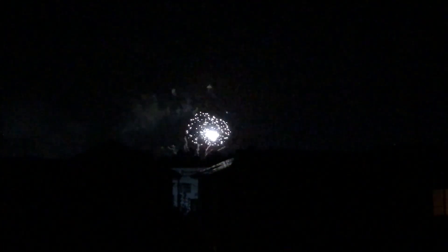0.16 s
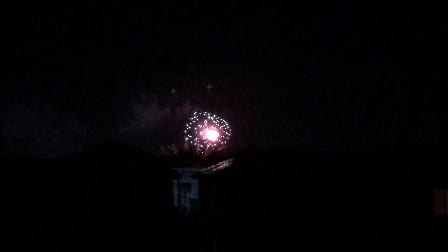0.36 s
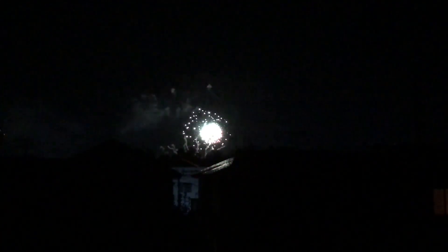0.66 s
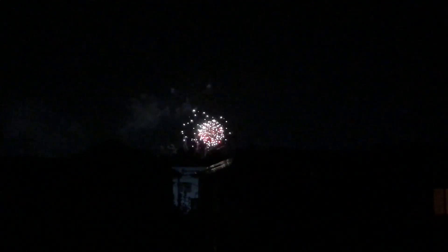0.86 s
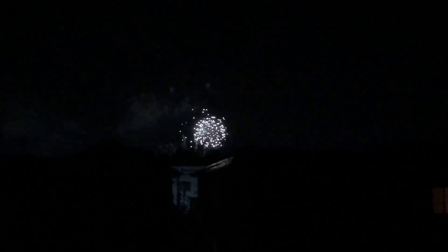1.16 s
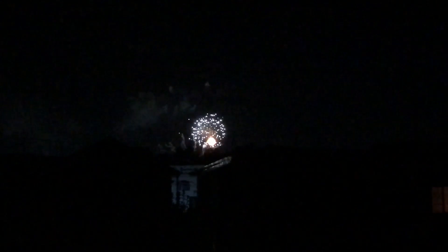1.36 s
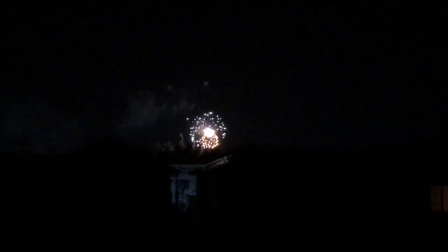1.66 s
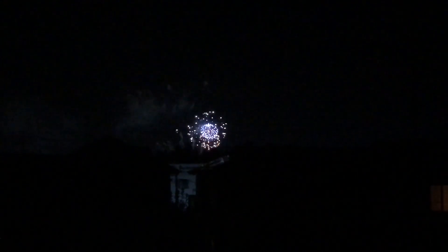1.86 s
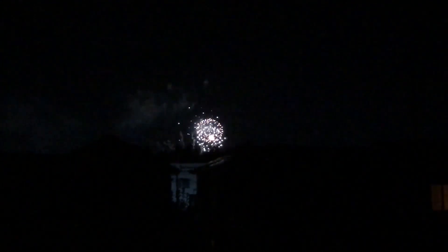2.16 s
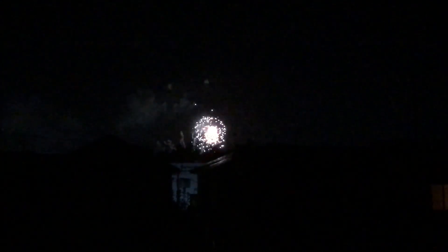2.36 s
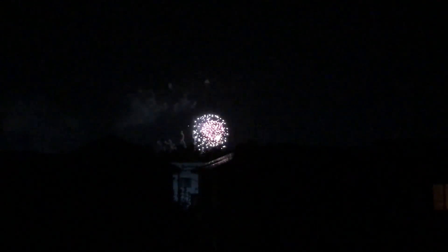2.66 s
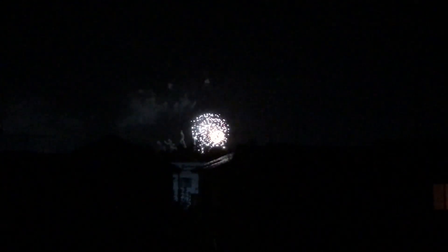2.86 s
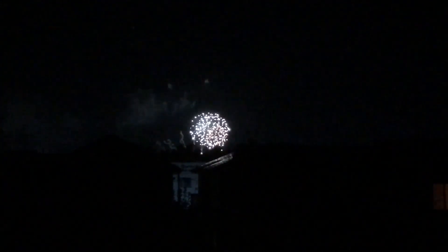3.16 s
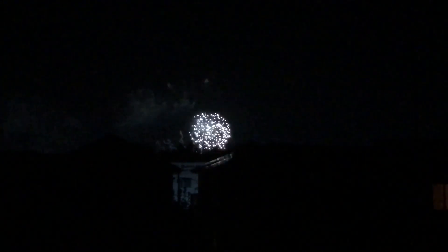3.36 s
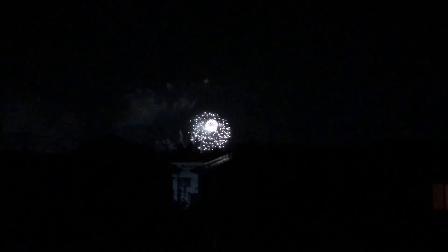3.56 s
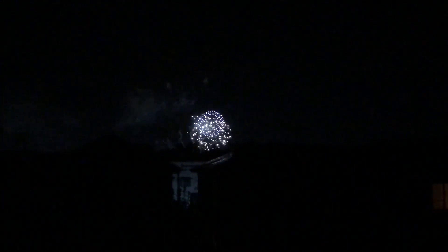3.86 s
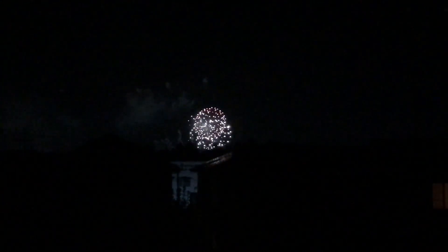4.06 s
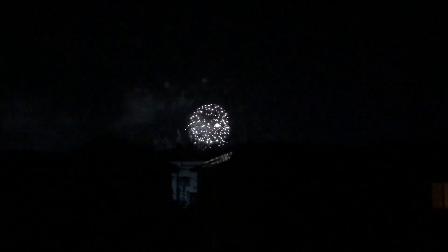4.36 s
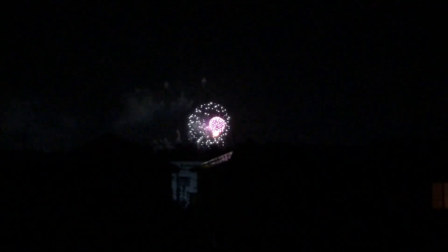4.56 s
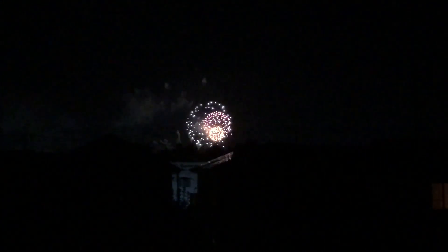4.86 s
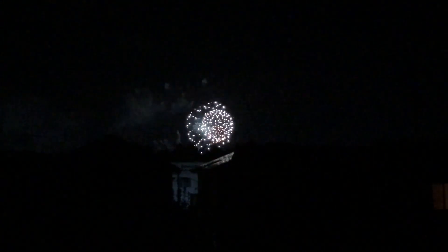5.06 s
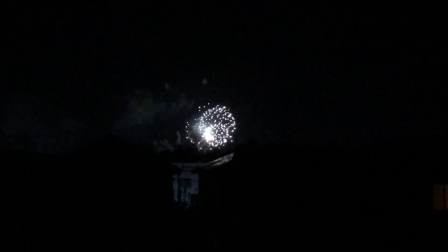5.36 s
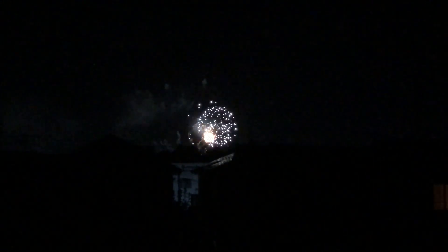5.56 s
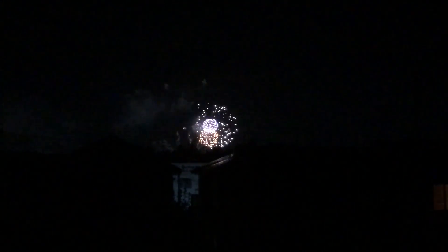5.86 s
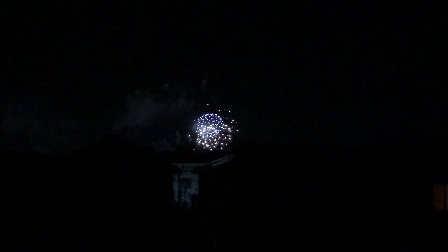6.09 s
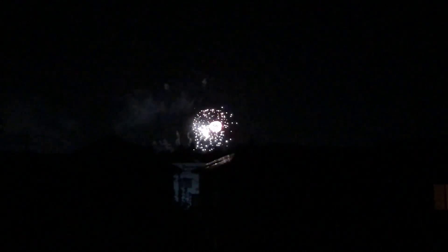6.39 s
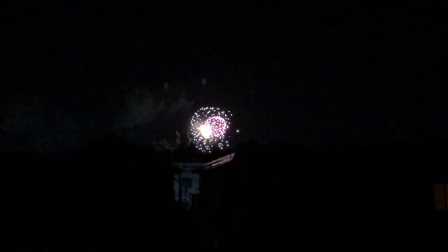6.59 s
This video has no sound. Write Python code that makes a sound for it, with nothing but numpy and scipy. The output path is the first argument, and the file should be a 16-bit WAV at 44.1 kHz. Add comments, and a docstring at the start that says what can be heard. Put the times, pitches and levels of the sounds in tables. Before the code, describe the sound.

Distant fireworks over dark open land: low booming double reports with brief cracks on top, each trailing a rolling echo that decays before the next. Small faint pops fall between them. Nearby, a cricket whistles in quick pulsing phrases above a soft insect chorus, and a very high, hissing buzz rises and cuts off late on. Quiet, dull night air lies beneath, heard in mono..

```python
"""Crickets sing over quiet night air while the roll of earlier firework blasts dies away.
Shells then burst far off, mostly in pairs: shaped pulses whose crack slides down into a late thump.
Scattered reflections follow each report, then a lumpy roll of decaying noise from the land.
Insects are pulsed whistles and ringing noise; a thin high buzz, a train of ticks with hiss,
swells about once a second, loudest near the end."""
import sys
import numpy as np
from scipy import signal
from scipy.fft import rfft, irfft, next_fast_len
from scipy.io import wavfile
from scipy.ndimage import uniform_filter1d

SR = 44100
rng = np.random.default_rng(int(sys.argv[2]) if len(sys.argv) > 2 else 0)


def pcm_store(signal):
    """Save signal as 16-bit PCM."""
    levels = np.round(np.clip(np.atleast_2d(signal), -1, 1) * 32767)
    wavfile.write(sys.argv[1], SR, levels.astype(np.int16).T)


N = 296793  # length in samples
T = np.arange(N) / SR
SIZE = 2 * next_fast_len(N // 2 + 1)
HZ = np.fft.rfftfreq(SIZE, 1 / SR)


def gain_of(db):
    """Decibels to an amplitude factor."""
    return 10 ** (np.asarray(db) / 20)


def evened(x):
    """Scales to rms 1."""
    return x / np.sqrt(np.mean(x ** 2) + 1e-30)


def read(points, hz):
    """Reads a table of (pitch_hz, value) on a log-frequency axis."""
    f, value = np.transpose(points)
    return np.interp(np.log(hz + 1), np.log(f + 1), value)


def add(mix, start_s, sound):
    """Mixes a sound in at a start time, which may lie before zero."""
    at = round(start_s * SR)
    sound = sound[max(-at, 0):]
    part = mix[max(at, 0):][:len(sound)]
    part += sound[:len(part)]


def noise(db):
    """Noise of rms 1 with the given spectrum."""
    spectrum = rfft(rng.standard_normal(SIZE)) * gain_of(db)
    return evened(irfft(spectrum, SIZE)[:N])


def ring(hz, width_hz):
    """A wing resonance blurred by many paths through the grass: narrow noise of rms 1."""
    return noise(-20 * np.log10(1 + ((HZ - hz) / width_hz) ** 2))


def wander(hz):
    """Random drift of rms 1, mostly slower than the given rate."""
    return noise(-40 * np.log10(1 + (HZ / hz) ** 2))


def scatter(decay_s, start_s, per_s=4000, size=6000):
    """Weak reflections from nearby ground and trees: random signed taps, energy 1."""
    t = np.arange(size) / SR
    taps = rng.choice([-1., 1.], size) * (rng.random(size) < per_s / SR)
    # silent until start_s, fully open at twice that
    taps *= np.exp(-t / decay_s) * np.clip(t / start_s - 1, 0, 1)
    return taps / np.linalg.norm(taps)


# spectral shape of night air and distant rumble: pitch_hz [Hz], level_db [dB per Hz, relative]
AIR_SHAPE = [(15, -50.5), (30, -23.5), (60, -11.5), (120, -7), (210, 0.5), (300, -6.5), (400, -14),
             (600, -19), (1200, -24.5), (2500, -35.5), (5000, -40.5), (9500, -43), (14000, -46.5),
             (15600, -41)]
AIR_DB = -56


def night_air():
    """Steady noise shaped like still air and distant rumble, its level barely drifting."""
    return gain_of(AIR_DB + .5 * wander(4)) * noise(read(AIR_SHAPE, HZ))


# spectral shape of the far insect chorus: pitch_hz [Hz], level_db [dB per Hz, relative]
CHORUS_SHAPE = [(2900, -42), (3300, -17.5), (3600, -2.5), (3950, 1.5), (4200, -10.5), (4500, -22.5),
                (5000, -45)]


def far_chorus():
    """So many far singers that their whistles merge into a band of flickering noise."""
    return gain_of(-66.0 + 1.4 * wander(40)) * noise(read(CHORUS_SHAPE, HZ))


# a lisping insect's calls: start_s [s], end_s [s]
LISP_CALLS = [(.2, 1.2), (2.58, 3.7)]
LISP_DB, LISP_REST_DB = -82, -93.5  # amplitudes add during a call
LISP_RISE_S, LISP_FALL_S = .32, .12


def lisping_insect():
    """A high wing resonance that swells, holds and fades over its own faint steady lisp."""
    calls = np.zeros(N)
    for start_s, end_s in LISP_CALLS:
        rise, fall = (T - start_s) / LISP_RISE_S, (end_s - T) / LISP_FALL_S
        calls += np.clip(np.minimum(rise, fall), 0, 1)
    return (gain_of(LISP_REST_DB) + gain_of(LISP_DB) * calls) * ring(7830, 300)


TRILL_FIRST_S, TRILL_EVERY_S, TRILL_LENGTH_S = -.255, .873, .455


def trilling_cricket():
    """Fast wing strokes in evenly spaced runs that grow, creep up in pitch and stop short."""
    since = (T - TRILL_FIRST_S) % TRILL_EVERY_S
    gate = np.clip(np.minimum(since, TRILL_LENGTH_S - since) / .025, 0, 1)
    swell = gate * np.minimum(.5 + 2 * since, 1)
    stroke_hz = 100 + 4 * wander(5)
    beat = 1 + .7 * np.sin(2 * np.pi * np.cumsum(stroke_hz) / SR)
    whistle_hz = np.interp(since, [.15, .28], [6590, 6720])
    whistle = np.exp(2j * np.pi * np.cumsum(whistle_hz) / SR)
    # random amplitude and phase blur the pure tone
    blurred = (whistle * (wander(130) + 1j * wander(130))).real
    return gain_of(-79) * swell * evened(beat * blurred)


def chirping_cricket():
    """Evenly spaced chirps of a wing resonance that start quickly and fade into the grass."""
    first_s, period_s, hold_s = .128, .1797, .068
    age = (T - first_s) % period_s
    rise = np.minimum(age / .0068, 1)
    chirp = rise * np.exp(-np.maximum(age - hold_s, 0) / .043)
    return gain_of(-68) * chirp * ring(5232, 120)


def strokes(first_s, last_s, step_s, db):
    """Evenly spaced wing strokes as (start_s, level_db)."""
    count = round((last_s - first_s) / step_s) + 1
    return [(s, db) for s in np.linspace(first_s, last_s, count)]


# the nearest cricket's phrases, slow loud strokes and then quick soft ones:
# first_stroke_s [s], last_slow_stroke_s [s], last_quick_stroke_s [s]
CRICKET_PHRASES = [(0.373, 0.73, 1.477), (1.536, 1.854, 2.272), (2.301, 2.624, 3.196),
                   (3.242, 3.505, 3.666), (4.352, 4.841, 5.429), (6.061, 6.498, 6.72)]
SLOW_STEP_S, QUICK_STEP_S, PAUSE_S = .063, .038, .075  # steps are rounded to fit the phrase
SLOW_DB, QUICK_DB = -54.5, -59


def near_cricket():
    """Each wing stroke whistles, sagging in pitch, with a weaker, lower second half."""
    out = np.zeros(N)
    t = np.arange(-SR // 40, SR // 40) / SR
    first_half = np.exp(-(t / np.where(t < 0, .009, .006)) ** 2)
    shape = first_half + .7 * np.exp(-((t - .0115) / .005) ** 2)
    for first_s, turn_s, last_s in CRICKET_PHRASES:
        slow = strokes(first_s, turn_s, SLOW_STEP_S, SLOW_DB)
        quick = strokes(turn_s + PAUSE_S, last_s, QUICK_STEP_S, QUICK_DB)
        for s, db in slow + quick:
            hz = 4030 + 30 * rng.standard_normal() - 21000 * t  # sags 21 Hz each millisecond
            angle = 2 * np.pi * np.cumsum(hz) / SR
            stroke = shape * (np.sin(angle) + gain_of(-26) * np.sin(2 * angle))
            add(out, s + t[0], gain_of(db + 1.0 * rng.standard_normal()) * stroke)
    grass = gain_of(-7) * signal.fftconvolve(out, scatter(decay_s=.018, start_s=.003))[:N]
    return out + grass


# swells of the high buzz: full_strength_s [s], level_db [dB, before the buzz's final trim]
BUZZ_SWELLS = [(1.69, -84.5), (2.72, -83), (3.66, -84), (4.68, -81.5), (5.72, -63), (6.76, -62.5)]
BUZZ_RISE_DB_PER_S, BUZZ_HOLD_S, BUZZ_FALL_DB_PER_S, BUZZ_REST_DB = 48.5, .22, 200, -96


def buzz_level():
    """Buzz level in dB before trim: every swell climbs steadily, holds, then drops away."""
    swells = []
    for s, db in BUZZ_SWELLS:
        climb = BUZZ_RISE_DB_PER_S * np.maximum(s - T, 0)
        drop = BUZZ_FALL_DB_PER_S * np.maximum(T - s - BUZZ_HOLD_S, 0)
        swells.append(db - climb - drop)
    return np.maximum(np.max(swells, axis=0), BUZZ_REST_DB)


# colour of the buzz when soft: pitch_hz [Hz], level_db [dB, relative]
SOFT_COLOUR = [(8000, -25.5), (10500, -10.5), (11600, -0.5), (12300, 7), (13300, -9.5), (16000, -20)]
# its wider colour when loud: pitch_hz [Hz], level_db [dB, relative]
LOUD_COLOUR = [(7300, -34), (8500, -24), (9500, -15.5), (11000, -4), (12700, 1.5), (14000, -3), (15700, -5)]
BUZZ_HZ = 348.3  # ticks per second


def high_buzz():
    """A train of tiny ticks, built from its high overtones plus hiss, widening with effort."""
    db = buzz_level()
    effort = np.clip((db + 81) / 12, 0, 1)
    turns = np.cumsum(BUZZ_HZ * (1 + .0003 * wander(4))) / SR
    slow = T[::1024]
    ticks = np.zeros(N)
    for k in np.arange(22, 46):
        # each overtone comes and goes
        flicker = evened(uniform_filter1d(rng.standard_normal(len(slow)), size=20))
        flicker_db = (1.5 + 3.5 * effort) * np.interp(T, slow, flicker)
        ticks += gain_of(flicker_db) * np.cos(2 * np.pi * (k * turns + rng.random()))
    # hoarser when faintest and again at greatest effort
    hiss_share = np.interp(db, [-84, -76, -66, -60], [1.3, .8, .8, 1.3])
    spectrum = rfft(evened(ticks) + hiss_share * rng.standard_normal(N), SIZE)
    soft = evened(irfft(spectrum * gain_of(read(SOFT_COLOUR, HZ)))[:N])
    loud = evened(irfft(spectrum * gain_of(read(LOUD_COLOUR, HZ)))[:N])
    trim_db = -1.0 + 1.2 * wander(30)
    return gain_of(db + trim_db) * (soft + effort * (loud - soft))


# colour of the rolling echo: pitch_hz [Hz], level_db [dB, relative]
ECHO_COLOUR = [(22, -47.5), (60, -9), (120, -6.5), (210, 4), (290, -7.5), (400, -11.5), (600, -17),
               (1200, -24.5), (2500, -35.5), (4000, -47.5), (12000, -85.5)]
# time the echo takes to fall 60 dB: pitch_hz [Hz], t60_s [s]
ECHO_DECAY = [(60, 1.8), (200, 1.22), (600, 1.79), (1500, 1.45), (4000, 1.27)]


def roll(lumps_db, rise_s):
    """Woods and hills return a blast in lumps: noise whose pitch bands decay at their own rates."""
    hz, t, z = signal.stft(rng.standard_normal(2 * SR), SR, nperseg=1024, noverlap=768)
    t60 = read(ECHO_DECAY, hz)[:, None]
    lumps = evened(uniform_filter1d(rng.standard_normal(len(t)), size=5))
    z = z * gain_of(read(ECHO_COLOUR, hz)[:, None] + lumps_db * lumps)
    z = z * np.exp(-np.log(1000) * t / t60)
    tail = signal.istft(z, SR, nperseg=1024, noverlap=768)[1]
    onset = 1 - np.exp(-np.arange(len(tail)) / SR / rise_s)
    return tail * onset * np.sqrt(10 / SR)


# the report after its long way over the ground: pitch_hz [Hz], level_db [dB, relative]
REPORT_COLOUR = [(12, -68.5), (30, -53.5), (57, -19.5), (100, -9), (165, 1), (265, -1.5), (400, -24),
                 (540, -16), (700, -19.5), (900, -28), (1200, -18.5), (1550, -31.5), (3800, -41),
                 (6500, -66.5), (15000, -105)]
# low notes creep along the ground and arrive late: pitch_hz [Hz], delay_ms [ms]
GROUND_LAG = [(40, 15), (100, 11.5), (150, 6.3), (200, 3.4), (300, 1.9), (500, 1.3), (1000, .6),
              (3000, .15), (8000, .02)]
LEAD = 88  # samples ahead of the blast


def report(crack_db, snap_db, pitch, size=8192):
    """One blast, starting LEAD samples in: a causal pulse whose low notes trail behind the crack."""
    hz = np.fft.rfftfreq(size, 1 / SR)
    treble = hz ** 2 / (hz ** 2 + 520 ** 2)
    top = hz ** 4 / (hz ** 4 + 2400 ** 4)
    shifted = hz / pitch ** (1 - treble)  # a bigger charge lowers only the thump
    gain = gain_of(read(REPORT_COLOUR, shifted) + treble * crack_db + top * snap_db)
    # minimum phase puts the pulse's energy as early as its spectrum allows
    causal = -signal.hilbert(np.log(np.r_[gain, gain[-2:0:-1]])).imag[:len(hz)]
    late = 2 * np.pi * np.cumsum(read(GROUND_LAG, shifted)) * hz[1] / 1000
    # turbulent air frays the crack into close arrivals, the more so the higher the note
    fray = rfft(scatter(decay_s=.003, start_s=.0002, per_s=12000, size=400), size)
    share = 1.5 * hz / (hz + 1900)
    paths = (1 + share * fray) / np.hypot(1, share)
    pulse = np.roll(irfft(gain * paths * np.exp(1j * (causal - late))), LEAD)
    return pulse * signal.windows.tukey(size, 2 * LEAD / size)


# far-off pops and slaps: start_s [s], level_db [dB against a full report], crack_db [dB]
FAR_POPS = [(0.377, -29, 9), (1.511, -30, 7.5), (2.738, -41.5, 7), (3.297, -13, -16), (3.922, -55, 5),
            (4.777, -29, -10), (5.369, -28, 11.5)]
REPORT_DB = 31.5  # a full report


def far_pops():
    """Fainter, higher-pitched reports heard only through scattered reflections."""
    out = np.zeros(N)
    for s, db, crack_db in FAR_POPS:
        direct = report(crack_db, snap_db=-3.5, pitch=1.146)
        pop = signal.fftconvolve(direct, scatter(decay_s=.056, start_s=.00079))
        add(out, s - LEAD / SR, gain_of(REPORT_DB + db) * pop)
    return out


# one row a shell: start_s [s], level_db [dB against a full report], crack_db [dB on the treble],
# snap_db [dB on the top treble], thump_pitch [factor], echo_db [dB against the usual roll]
SHELL_BURSTS = [(-.52, 0, 0, 0, 1, 5.5), (-.44, 0, 0, 0, 1, 6.5), (1.0995, 1, 3.5, -1, 0.95, 2),
                (1.1666, 1, -2, -1.5, 0.99, 1), (2.0602, 2.5, -3.5, 0, 0.913, 2.5),
                (2.1644, -1, -3.5, 0, 1.03, -3), (3.1467, -1, 0.5, -12.5, 1.01, -4),
                (3.2406, 4, -5, -7, 1.02, 1), (4.2918, 2.5, -5.5, -4.5, 0.98, 1),
                (4.4177, 1.5, -6, -2.5, 1.01, -4.5), (5.3894, 1.5, 2.5, 2, 0.96, 2.5),
                (5.4621, 2, -1.5, -1.5, 0.97, 0.5), (6.4689, -0.5, 1, 5, 1.045, -1)]
ECHO_DB = 19  # the usual roll


def fireworks():
    """Every shell: the direct report, near reflections, then the long roll."""
    out = np.zeros(N)
    for s, db, crack_db, snap_db, pitch, echo_db in SHELL_BURSTS:
        level, start_s = gain_of(REPORT_DB + db), s - LEAD / SR
        add(out, start_s, level * report(crack_db, snap_db, pitch))
        dulled = level * report(crack_db - 3.5, snap_db, pitch)  # foliage swallows treble
        near = signal.fftconvolve(dulled, scatter(decay_s=.015, start_s=.0067))
        add(out, start_s, gain_of(-12) * near)
        add(out, s, gain_of(ECHO_DB + echo_db) * roll(lumps_db=2.5, rise_s=.0018))
    return out


def scene():
    """Fireworks and insects over the quiet night air, as one channel."""
    insects = far_chorus() + lisping_insect() + trilling_cricket() + chirping_cricket()
    insects = insects + near_cricket() + high_buzz()
    return (night_air() + insects + far_pops() + fireworks())[None]


def record(dry):
    """The microphone drops the deepest bass; then a steep low-pass limits the band."""
    lean = signal.sosfilt(signal.butter(1, 25, "highpass", fs=SR, output="sos"), dry)
    band = signal.firwin(511, 15800, window=("kaiser", 9), fs=SR)  # edge in Hz
    return signal.oaconvolve(lean, band[None], "same")


dry = scene()
out = record(dry)
pcm_store(out)
```